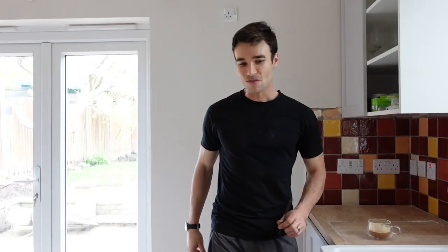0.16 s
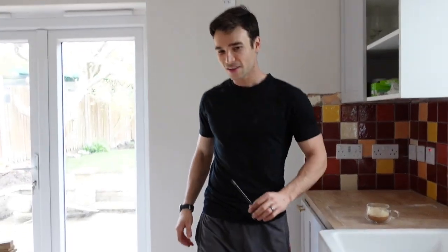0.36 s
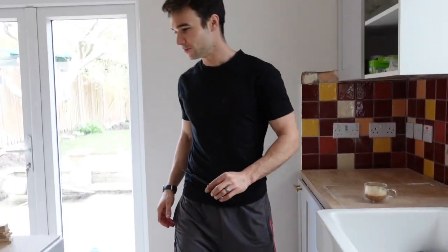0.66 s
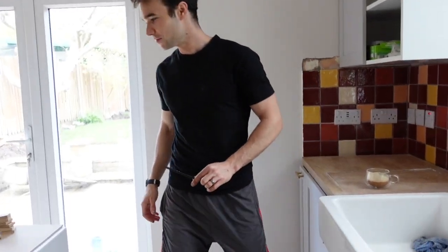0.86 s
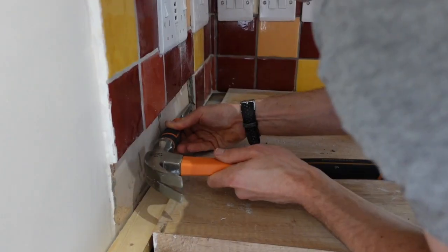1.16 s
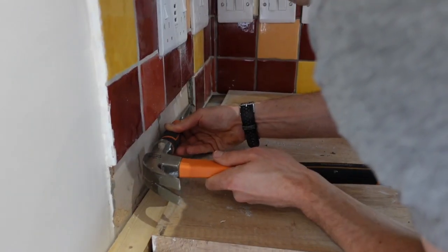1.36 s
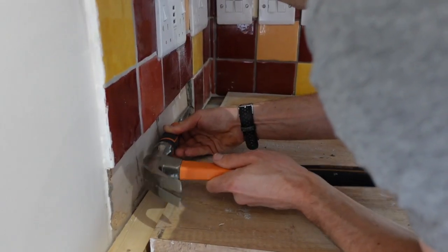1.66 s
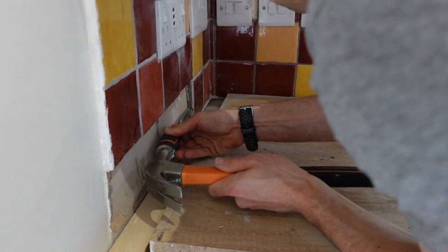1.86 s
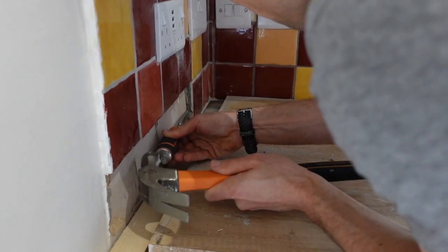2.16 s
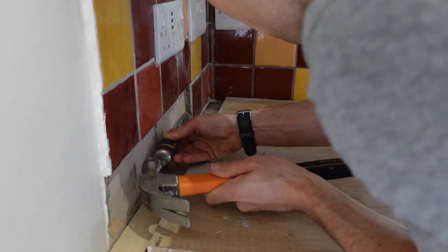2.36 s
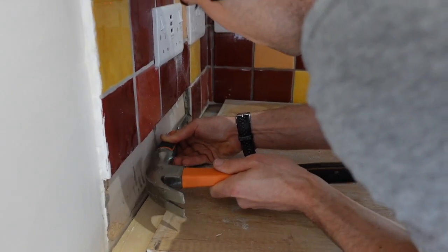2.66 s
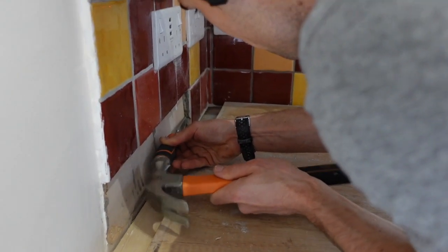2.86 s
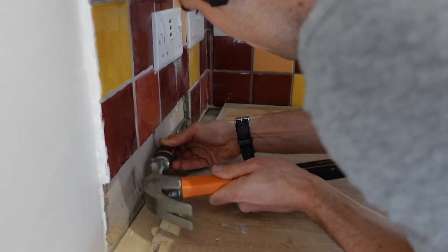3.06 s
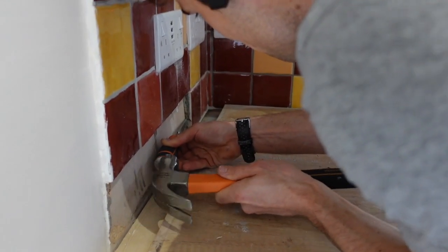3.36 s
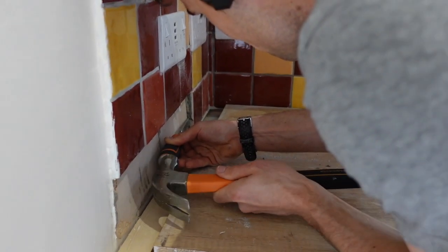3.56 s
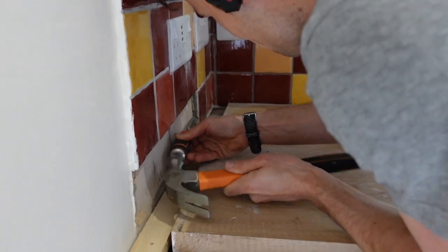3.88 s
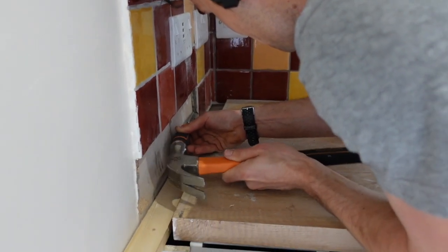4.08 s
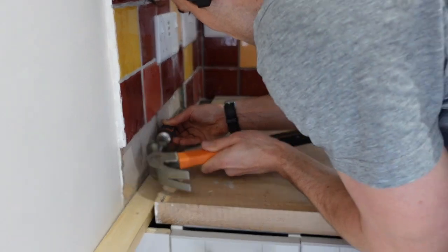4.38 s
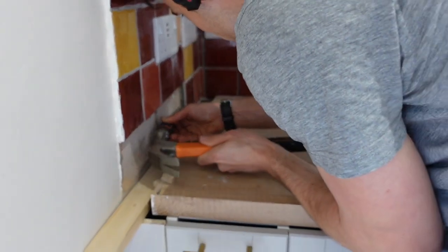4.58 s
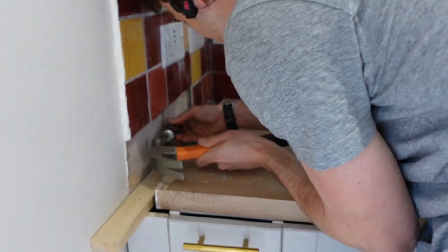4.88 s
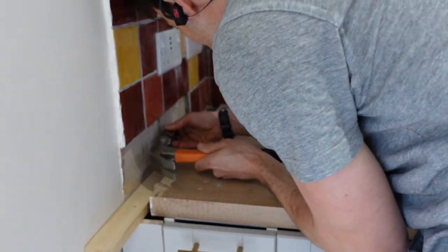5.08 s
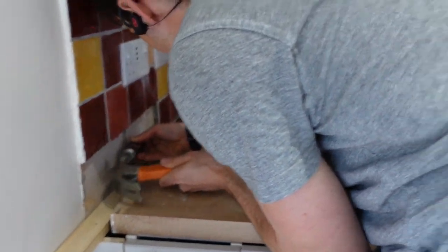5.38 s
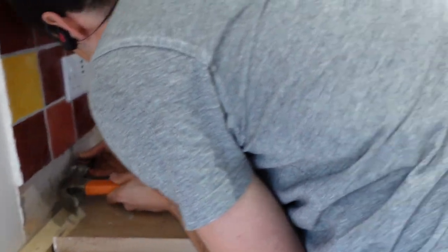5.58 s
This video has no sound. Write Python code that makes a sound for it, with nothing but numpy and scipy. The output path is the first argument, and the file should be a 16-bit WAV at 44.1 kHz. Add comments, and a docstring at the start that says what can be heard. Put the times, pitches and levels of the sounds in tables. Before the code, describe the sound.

Someone turns on their feet with a soft scuff and a rustle of cloth. After a light tap and a few faint knocks, steady hammering begins close by: steel on a chisel, working tiles off a hollow kitchen wall. The strikes clack at first, ring most as the tile is levered, then turn to harder cracks and thuds as the chisel goes deeper. The bare room echoes each one.

```python
"""Shoes scuff and cloth swishes as a man turns on his feet in a bare, echoing kitchen.
Then he hammers a steel chisel behind wall tiles. Each impact cracks the tile, excites the modes of the
hollow wall and sets the steel ringing, and the room reverberates. As the chisel goes deeper the blows
lose their clack; while it levers the tile hard, tile and wall ring most.
A limiter holds the loud blows down, so their tails swell as it lets go."""
import sys
import numpy as np
from scipy import signal
from scipy.fft import rfft, irfft, next_fast_len
from scipy.io import wavfile
from scipy.ndimage import uniform_filter1d

SR = 44100
rng = np.random.default_rng(int(sys.argv[2]) if len(sys.argv) > 2 else 0)


def to_wav(s):
    """Save 16-bit WAV."""
    ch = np.atleast_2d(s).T  # columns
    pcm = np.round(np.clip(ch, -1, 1) * 32767)  # PCM
    wavfile.write(sys.argv[1], SR, pcm.astype(np.int16))


N = 252693
TAIL = 40000  # samples in one impact and its decay
TIME, AGE = np.arange(N) / SR, np.arange(TAIL) / SR  # seconds into the scene, and since an impact


def amp(db):
    """Decibels to amplitude ratio."""
    return 10 ** (np.asarray(db) / 20)


def unit_rms(x):
    """Normalisation to an rms of 1."""
    return x / np.sqrt(np.mean(x ** 2) + 1e-20)


def at_time(points, s):
    """Linear interpolation of (time_s, value) points."""
    return np.interp(s, *np.transpose(points))


def at_hz(points, hz):
    """Interpolation of (frequency_hz, value) points on a logarithmic frequency axis."""
    point_hz, values = np.transpose(points)
    return np.interp(np.log(hz + 1), np.log(point_hz + 1), values)


def add(mix, start_s, sound):
    """Superposition: a sound sums into the stereo mix from start_s."""
    part = mix[:, round(start_s * SR):][:, :sound.shape[-1]]
    part += sound[..., :part.shape[-1]]


def coloured(x, curve_db):
    """Minimum-phase filter of shape curve_db(hz), scaled to conserve the power of white noise."""
    size = 2 * next_fast_len(x.shape[-1] // 2 + 2048)
    gain = unit_rms(amp(curve_db(abs(np.fft.fftfreq(size, 1 / SR)))))
    response = np.exp(np.conj(signal.hilbert(np.log(gain + 1e-6))))
    return irfft(rfft(x, size) * response[:size // 2 + 1], size)[..., :x.shape[-1]]


def decay(t60_s):
    """Exponential damping, 60 dB down after t60_s."""
    return np.exp(-np.log(1000) * AGE / np.maximum(t60_s, 1e-3))


# Stereo width of the room's sound: frequency_hz, side_re_mid_db
WIDTH = [(100, -93), (250, -28), (600, -12), (1300, -10.5), (5000, -6.5), (9000, -5), (15000, -6)]

def diffuse_noise(size):
    """Diffuse field: left and right are nearly alike in the bass and less coherent in the treble."""
    mid, side = rng.standard_normal((2, size))
    side = irfft(rfft(side) * amp(at_hz(WIDTH, np.fft.rfftfreq(size, 1 / SR))), size)
    return np.array([mid + side, mid - side])


# Spectrum of the background: frequency_hz, density_db
AMBIENT_SPECTRUM = [(30, -32), (100, -7), (200, -2.5), (600, 1), (950, 6), (1600, -1.5), (3000, -7.5),
                    (6000, -10.5), (10000, -22), (15000, -24)]
# Its level, which steps up near 1 s: time_s, level_db
AMBIENT_LEVEL = [(.97, -61.5), (1, -53)]

def ambience():
    """Ambient noise: the quiet of the house is a faint diffuse field."""
    noise = coloured(diffuse_noise(N), lambda hz: at_hz(AMBIENT_SPECTRUM, hz))
    return amp(at_time(AMBIENT_LEVEL, TIME)) * unit_rms(noise)


def friction(strokes, spectrum, grain_db=1.0, width=0.46, still_s=0.97, release_s=0.0092):
    """Stick-slip friction: countless tiny slips sum to a flickering hiss that swells with each stroke."""
    mid, side = rng.standard_normal((2, N))
    noise = np.array([mid + width * side, mid - width * side])
    hiss = unit_rms(coloured(noise, lambda hz: at_hz(spectrum, hz)))
    slips = unit_rms(uniform_filter1d(rng.standard_normal(N), size=120))
    power = np.zeros(N)
    for start_s, attack_s, level_db, fade_db_per_s in strokes:
        attack = np.clip((TIME - start_s) / attack_s, 0, 1)
        fade_db = fade_db_per_s * np.maximum(TIME - start_s - attack_s, 0)
        power += (attack * amp(level_db - fade_db)) ** 2
    moving = np.clip((still_s - TIME) / release_s, 0, 1)
    return hiss * np.sqrt(power) * amp(grain_db * slips) * moving


# Strokes of shoe and of cloth: start_s, attack_s, level_db, fade_db_per_s
SCUFFS = [(.384, 0.024, -31, 76), (.89, 0.075, -43, 300)]
SWISHES = [(.29, 0.025, -68, 5), (.555, 0.045, -46, 45), (.685, .045, -40, 42), (.93, 0.04, -44, 300)]
# Their spectra: frequency_hz, density_db
SCUFF_SPECTRUM = [(50, -38), (150, -20), (400, -11.5), (900, -8.5), (1900, 1.5), (3200, -3), (5500, -5),
                  (9000, -20), (15000, -40)]
SWISH_SPECTRUM = [(100, -32), (1200, -21), (2500, -12), (5800, -4), (9500, -6.5), (15000, -23)]

def footwork():
    """Sliding friction: a shoe rubs the floor and cloth rubs on cloth as the man turns."""
    return friction(SCUFFS, SCUFF_SPECTRUM) + friction(SWISHES, SWISH_SPECTRUM)


# Dry clicks, and light knocks of wood, tool and loose chips: start_s, level_db, pitch_hz, t60_s
CLICKS = [(.683, -16, 3650, 0.0058), (.8862, -31, 7500, 0.0046), (.9065, -31.5, 4100, 0.013),
          (.9115, -40, 5000, .012), (.918, -45, 4500, 0.01)]
KNOCKS = [(.683, -46.5, 450, 0.048), (.908, -44.5, 496, 0.17), (.9985, -27, 2530, 0.046),
          (1.205, -37.5, 426, 0.49), (1.212, -31, 1740, 0.32), (1.305, -38, 424, 0.45),
          (1.308, -39.5, 1770, 0.32)]

def taps(contacts, slope_db_per_octave):
    """Impulsive excitation: each small contact is a noise burst through one broad resonance."""
    out = np.zeros((2, N))
    for start_s, level_db, pitch_hz, t60_s in contacts:
        burst = diffuse_noise(TAIL) * decay(t60_s)
        tap = coloured(burst, lambda hz: -slope_db_per_octave * np.hypot(np.log2((hz + 1) / pitch_hz), .5))
        add(out, start_s, amp(level_db) * tap)
    return out


# Reverberation time of the kitchen: frequency_hz, t60_s
REVERB_TIME = [(100, 0.87), (300, 0.6), (1000, 0.75), (2200, 0.89), (4500, 0.75), (9000, 0.59),
               (15000, 0.37)]

def room_response(early_db=-3, gather_s=0.025):
    """Reverberation: reflections gather, then each band is absorbed at its own rate."""
    hz, age_s, bands = signal.stft(diffuse_noise(TAIL), SR, nperseg=256)
    bands = bands * np.exp(-np.log(1000) * age_s / at_hz(REVERB_TIME, hz)[:, None])
    reverb = signal.istft(bands, SR, nperseg=256)[1][:, :TAIL]
    return reverb * amp(early_db * np.exp(-(AGE / gather_s) ** 2))


def rebounds(hz, strength=0.22, within_s=.004, above_hz=2200, count=3):
    """Comb filtering: a contact interferes with its quick rebounds, mostly in the treble."""
    delay_s = within_s * rng.uniform(0.206, 1, (count, 1))
    rebound = strength * hz / np.hypot(hz, above_hz)
    return (1 + rebound * np.exp(-2j * np.pi * hz * delay_s).sum(0)) / np.sqrt(1 + count * rebound ** 2)


def blow_path(s, first_path, last_path, fresh_hz=5500):
    """Decorrelation: the room path drifts as the tool moves, and crumbling grout renews the treble."""
    hz = np.fft.rfftfreq(TAIL, 1 / SR)
    angle = np.pi / 2 * s / TIME[-1]
    shared = np.cos(angle) * first_path + np.sin(angle) * last_path
    fresh = hz / np.hypot(hz, fresh_hz)
    comb = rebounds(hz)
    spectrum = rfft(shared) * np.sqrt(1 - fresh ** 2) + rfft(room_response()) * fresh
    return irfft(comb * spectrum, TAIL)


# Modes of wall and worktop: pitch_hz, level_db, t60_s, build_s
WALL_MODES = [(123.1, -27.5, 0.4, 0.03), (158.5, -18.5, 0.77, 0.065), (202.7, -20.5, 0.88, 0.014),
              (307.8, -6.5, 0.32, 0.046), (360.4, -17, 0.76, 0.047), (407.6, -14.5, 0.49, 0.0063),
              (422, -10, 0.42, 0.011), (501, -18, 0.66, 0.023), (875, -28, 0.98, 0.015),
              (987, -26, 0.24, 0.011), (1117, -18.5, 0.29, 0.0031), (1210, -18, 0.5, 0.013),
              (1325, -21, 0.25, 0.0051)]

def wall_boom():
    """Modal vibration: each mode of the hollow wall builds from rest and decays; close pairs beat."""
    boom = np.zeros(TAIL)
    for pitch_hz, level_db, t60_s, build_s in WALL_MODES:
        build = np.sin(np.pi / 2 * np.minimum(AGE / build_s, 1)) ** 2
        boom += amp(level_db) * build * decay(t60_s) * np.sin(2 * np.pi * pitch_hz * AGE)
    return boom


def wavering_mode(pitch_hz, t60_s, waver, waver_hz):
    """Interference: reflections make a damped mode waver, a little differently left and right."""
    drift = rng.standard_normal((3, TAIL)) + 1j * rng.standard_normal((3, TAIL))
    lowpass = np.exp(-(np.fft.fftfreq(TAIL, 1 / SR) / waver_hz) ** 2)
    drift = np.fft.ifft(np.fft.fft(drift) * lowpass)
    drift /= drift.std()
    envelope = (1 + waver * (.5 * drift[:2] + drift[2])) / np.hypot(1, waver)
    return (envelope * np.exp(2j * np.pi * pitch_hz * AGE)).real * decay(t60_s)


def steel_ring(swell_s, build_s=0.06, swell_db=5.0, swell_width_s=0.089):
    """Free vibration: the steel's lightly damped mode builds up and swells in the room."""
    ring = wavering_mode(pitch_hz=5604.8, t60_s=2.12, waver=.3, waver_hz=9)
    swell = amp(swell_db * np.exp(-((AGE - swell_s) / swell_width_s) ** 2))
    return ring * swell * (1 - decay(build_s))


def steel_ping(pitch_hz=4016, direct_db=5, room_db=-3):
    """Direct and reverberant sound: the steel's short mode speaks at once and lingers in the room."""
    direct = np.sin(2 * np.pi * pitch_hz * AGE) * decay(t60_s=0.14)
    reflected = wavering_mode(pitch_hz, t60_s=0.69, waver=0.91, waver_hz=30.2)
    return amp(direct_db) * direct + amp(room_db) * reflected


# How far the chisel is behind the tile: time_s, depth_fraction
DEPTH = [(1, 0.36), (1.7, 0.12), (2.15, 0.4), (2.75, 0.33), (3, 0.49), (4.1, 0.85), (5.6, 0.94)]
# How hard it levers the tile, which gives way after 3.1 s: time_s, strain_fraction
STRAIN = [(1, 0.43), (1.7, 0), (1.9, 0), (2.13, 0.51), (2.4, 0.61), (2.72, 0.95), (3.1, 0.94), (3.65, 0.52),
          (4.1, 0.2), (5.6, 0)]
# Parts of a blow: base_db, full_depth_adds_db, full_strain_adds_db
RUMBLE, THUD, BODY = (-2.1, 1.5, 7.5), (-12, 9, 9.8), (-.3, 3.9, -1.1)
CLACK, GRIT, TILE_RING = (7.76, -11, 0), (1.5, -4, 4), (-2.1, 0.92, 15.9)

def coupling_db(part, s):
    """Mechanical coupling: depth and strain set how strongly a blow at time s drives one part."""
    base_db, depth_db, strain_db = part
    return base_db + depth_db * at_time(DEPTH, s) + strain_db * at_time(STRAIN, s)


def tile_pitch(s, final_hz=1862, rise_hz=165.3, rise_from_s=2.33, settle_s=.24):
    """Natural frequency: the tile's note climbs, then settles, as the chisel bites."""
    return final_hz - rise_hz * np.exp(-max(s - rise_from_s, 0) / settle_s)


def tile_clank(s, gain_db=-17, build_s=0.013):
    """Plate resonance: the loosening tile rings at its note, most when levered hard."""
    strength = amp(gain_db) * (amp(coupling_db(TILE_RING, s)) - 1)
    mode = wavering_mode(tile_pitch(s), t60_s=1.0, waver=1.9, waver_hz=46.7)
    return strength * mode * (1 - decay(build_s))


# Bands of rumble, thud, body, plain middle, clack, grit and fizz: centre_hz
BAND_CENTRES = [110, 330, 1050, 2400, 4000, 8500, 12000]
# Topmost fizz, strongest while the grout crumbles: time_s, level_re_grit_db
FIZZ = [(1, -7.5), (1.7, -6.5), (1.9, 4), (2.45, 3), (2.95, -1.5), (5.1, 1), (5.6, -3)]
# Broad resonances of the chisel, damped by the hand: pitch_hz, half_width_hz, peak_db
CHISEL_MODES = [(2910, 120, 2), (4145, 63, 6.5), (5170, 110, 5), (5740, 220, 6.5), (7730, 600, 5),
                (9270, 150, 4), (10650, 300, 5.5), (12730, 1230, 6.5)]

def blow_colour(hz, s, force_db, firm_db=-15.5, body_db_per_db=.55, tile_half_width_hz=70):
    """Source-filter model: a blow's gain in dB is broad bands plus resonances of tile and chisel."""
    rumble, thud, body, clack, grit, tile_db = (
        coupling_db(part, s) for part in (RUMBLE, THUD, BODY, CLACK, GRIT, TILE_RING))
    body += body_db_per_db * max(firm_db - force_db, 0)  # a light blow is duller
    fizz = grit + at_time(FIZZ, s)
    sheen_db = 0.56 * tile_db
    bands_db = [rumble, thud, body, 0, clack, grit - sheen_db / 2, fizz - sheen_db / 2]
    modes = [(tile_pitch(s), tile_half_width_hz, tile_db),  # two damped plate modes
             (1.57 * tile_pitch(s), tile_half_width_hz, 0.4 * tile_db),
             (8500, 850, sheen_db),  # the tile's broad, high sheen
             *CHISEL_MODES]
    peaks_db = sum(db / (1 + ((hz - centre_hz) / width_hz) ** 2) for centre_hz, width_hz, db in modes)
    return at_hz(list(zip(BAND_CENTRES, bands_db)), hz) + peaks_db


# A blow as the room returns it, and the crack straight from the chisel: frequency_hz, density_db
REVERB_SPECTRUM = [(30, -54.5), (80, -34), (115, -18.5), (160, -8), (280, 0), (430, 0), (640, -6.5),
                   (1150, -4), (2300, -2), (3500, -8.5), (6700, -15), (8200, -16.5), (12000, -25.5),
                   (15500, -38)]
CRACK_SPECTRUM = [(50, -39), (300, -1.5), (1000, 4.5), (2200, 7.5), (4000, 1), (9000, -8), (15500, -33)]
# Hammer blows: start_s, force_db, crack_re_force_db, ping_db, ring_db, swell_after_s
BLOWS = [ (1.0082, -21, 6.5, -31, -46.5, .18), (1.6926, -11.5, -9, -20.5, -28, 0.068),
         (1.9143, -11.5, 2, -21.5, -19, 0.19), (2.1292, -12, 3, -17, -27.5, 0.17),
         (2.3431, -11.5, -2, -36, -20, 0.13), (2.5496, -9.5, 0, -19.5, -16, 0.19),
         (2.7695, -9.5, 0, -17.5, -17, .11), (2.9811, -10, 0, -17, -19, 0.13),
         (3.1995, -10.5, 4, -14.5, -23.5, 0.17), (3.425, -11.5, 4, -21.5, -21.5, 0.13),
         (3.6476, -11.5, 3.5, -19, -33, 0.067), (3.877, -10, 5, -24, -29, 0.18),
         (4.1033, -10.5, 6.5, -26.5, -26.5, .11), (4.3383, -10.5, 6.5, -23, -24.5, 0.067),
         (4.5832, -10, 8.5, -23.5, -22.5, 0.14), (4.8349, -10, 8, -24.5, -23, .16),
         (5.0909, -9.5, 8, -22.5, -22.5, 0.16), (5.3496, -9.5, 5, -30, -21.5, .2),
         (5.6006, -8.5, 1, -29, -25.5, 0.074)]

def hammering(crack_t60_s=0.013, boom_db=1, choke_s=0.0091):
    """Impact excitation: each blow gives a direct crack and drives room, tile, wall and steel."""
    out = np.zeros((2, N))
    first_path, last_path, wall = room_response(), room_response(), wall_boom()
    for s, force_db, crack_db, *_ in BLOWS:
        path = blow_path(s, first_path, last_path)
        reverb = coloured(path, lambda hz: at_hz(REVERB_SPECTRUM, hz) + blow_colour(hz, s, force_db))
        burst = (diffuse_noise(TAIL) * decay(crack_t60_s))[:, :TAIL // 10]
        crack = coloured(burst, lambda hz: at_hz(CRACK_SPECTRUM, hz) + blow_colour(hz, s, force_db))
        boom = amp(boom_db + coupling_db(THUD, s)) * wall
        add(out, s, amp(force_db) * (reverb + tile_clank(s) + boom))
        add(out, s, amp(force_db + crack_db) * crack)
    # the steel rings until the next blow chokes and restarts it
    ends_s = [blow[0] for blow in BLOWS[1:]] + [TIME[-1] + 1]
    for (s, *_, ping_db, ring_db, swell_s), end_s in zip(BLOWS, ends_s):
        steel = amp(ring_db) * steel_ring(swell_s) + amp(ping_db) * steel_ping()
        choke = np.clip((end_s - s - AGE) / choke_s, 0, 1)
        add(out, s, steel * choke)
    return out


def scene():
    """Superposition of footwork, small contacts and hammering over the quiet of the house."""
    movement = footwork() + taps(CLICKS, slope_db_per_octave=16)
    knocks = taps(KNOCKS, slope_db_per_octave=18)
    return movement + knocks + hammering() + ambience()


# The level dips briefly before the hammering and mostly returns over the first blows: time_s, gain_db
FADER = [(.968, -0.5), (.98, -13), (.993, -21), (.999, -4.5), (1.69, -7.5), (1.9, -3), (2.1, -3.5)]

def record(dry, limit_db=-15.0, duck_share=0.4, recover_db_per_s=75, ceiling=.85, cutoff_hz=16300):
    """Dynamic range compression: a look-ahead limiter, then soft clipping, fader and low-pass filter."""
    power = uniform_filter1d((dry ** 2).mean(0), size=800, origin=399)
    power_db = 10 * np.log10(abs(power) + 1e-12)
    recovery_db = TIME * recover_db_per_s
    held_db = np.maximum.accumulate(power_db + recovery_db) - recovery_db
    excess_db = np.maximum(held_db - limit_db, 0)
    excess_db = np.pad(excess_db[170:], (0, 170), "edge")  # look about 4 ms ahead
    ducked = dry * amp(-duck_share * uniform_filter1d(excess_db, size=40))
    rounded = ceiling * np.tanh(ducked / ceiling)
    faded = rounded * amp(at_time(FADER, TIME))
    lowpass = signal.firwin(511, cutoff_hz, window=("kaiser", 9), fs=SR)
    return signal.oaconvolve(faded, lowpass[None], "same")


dry = scene()
out = record(dry)
to_wav(out)
```